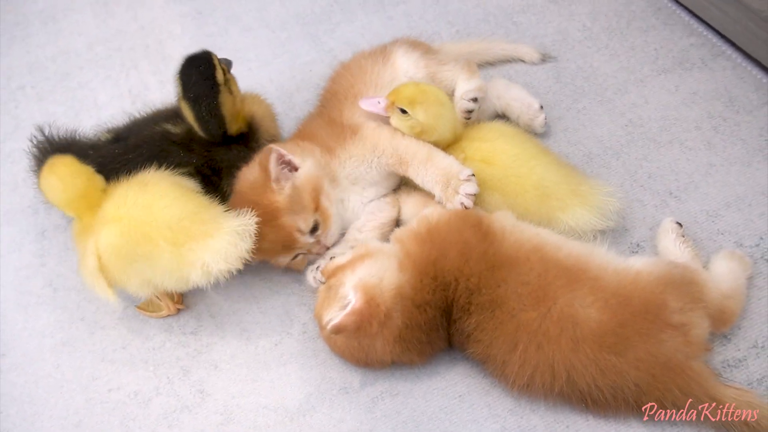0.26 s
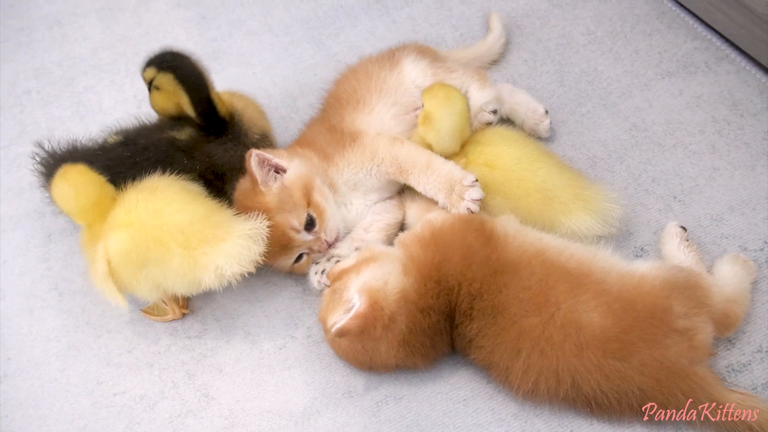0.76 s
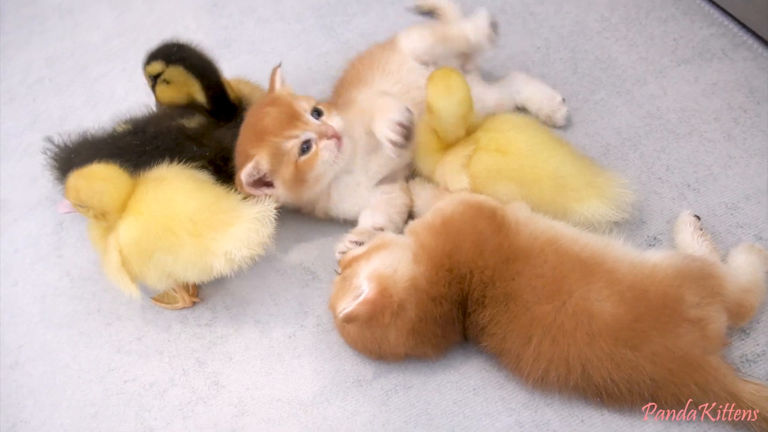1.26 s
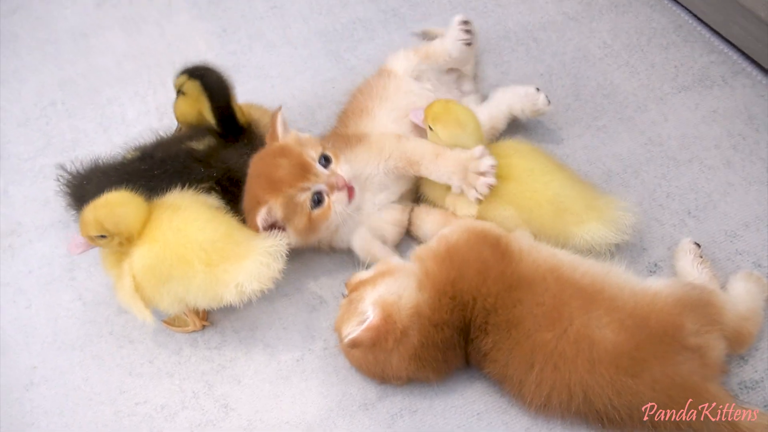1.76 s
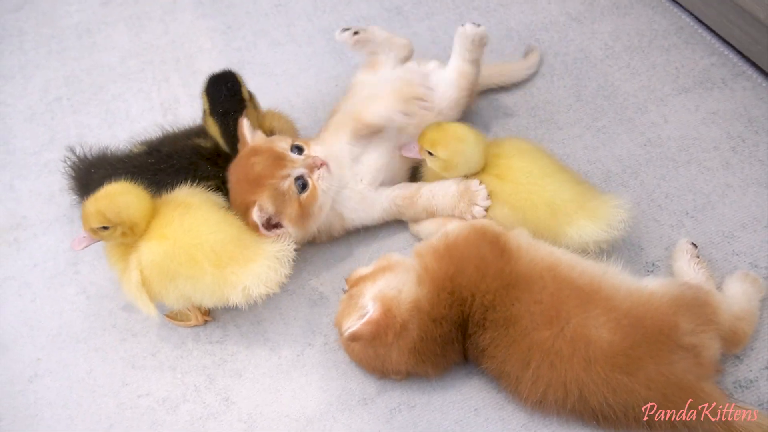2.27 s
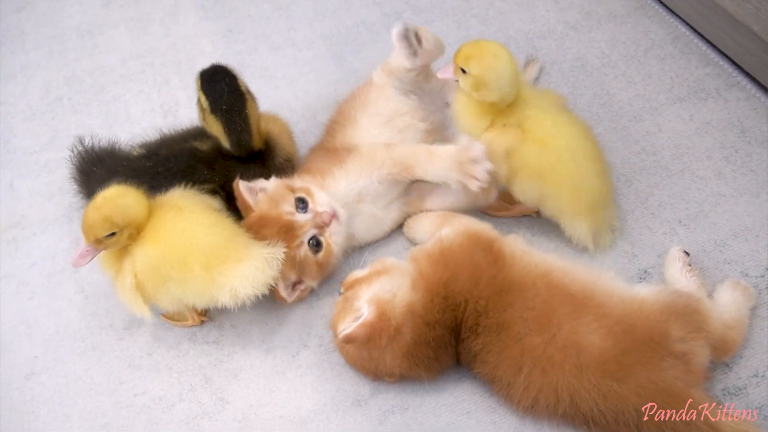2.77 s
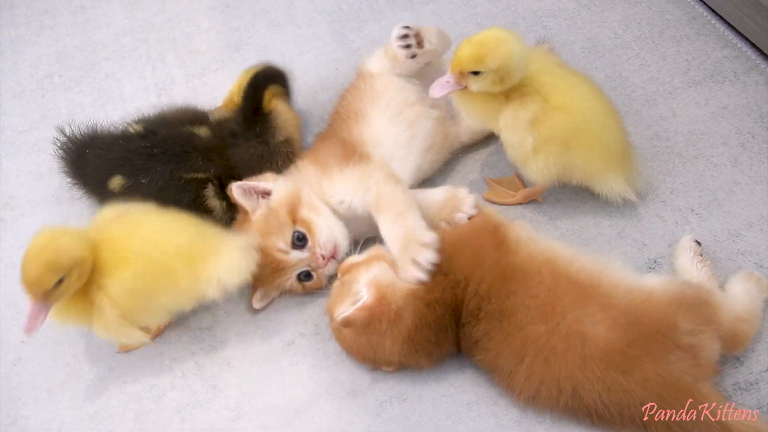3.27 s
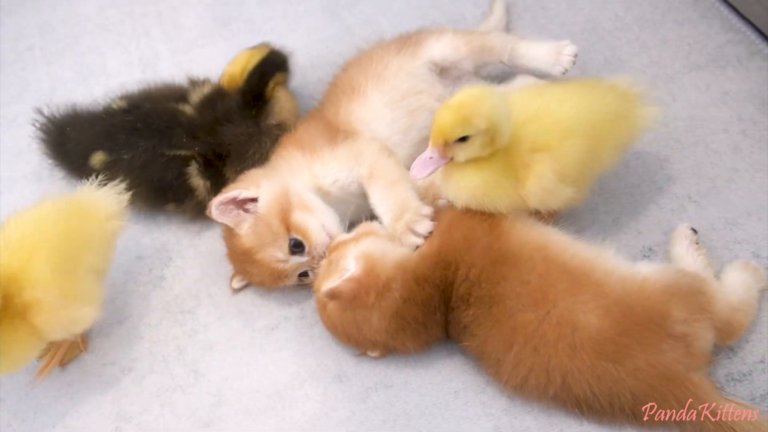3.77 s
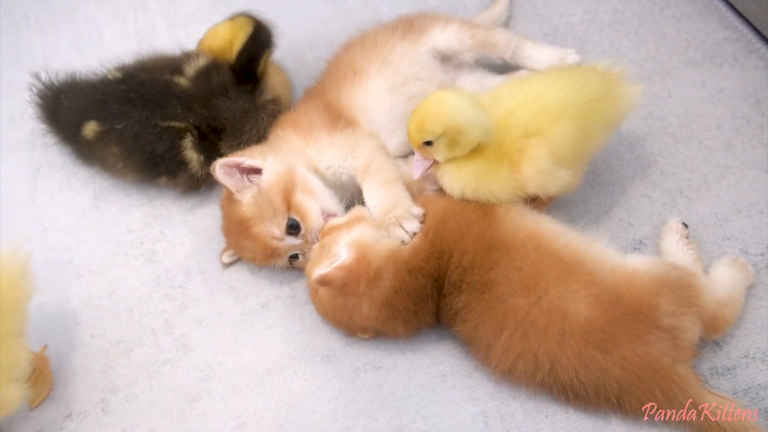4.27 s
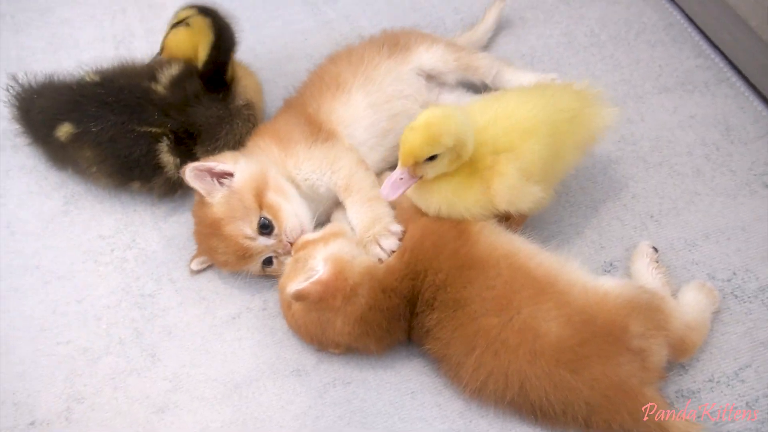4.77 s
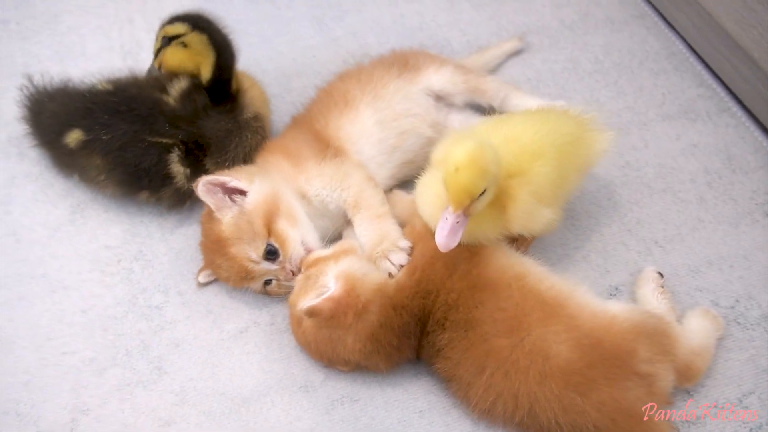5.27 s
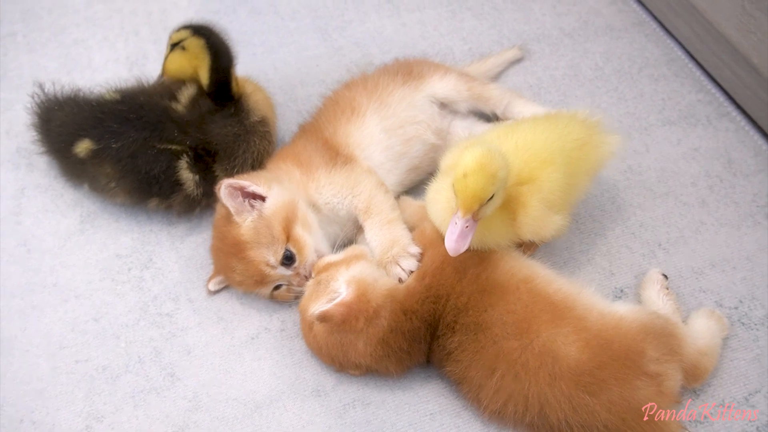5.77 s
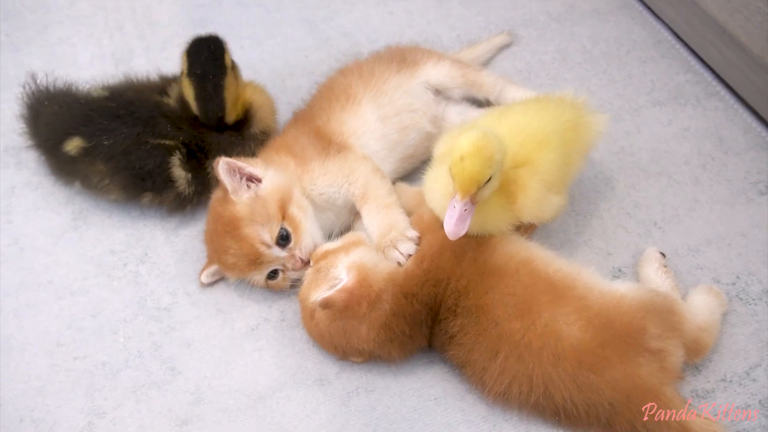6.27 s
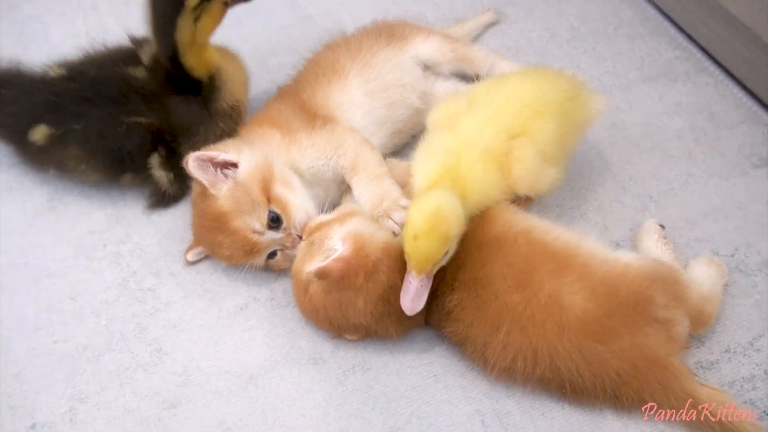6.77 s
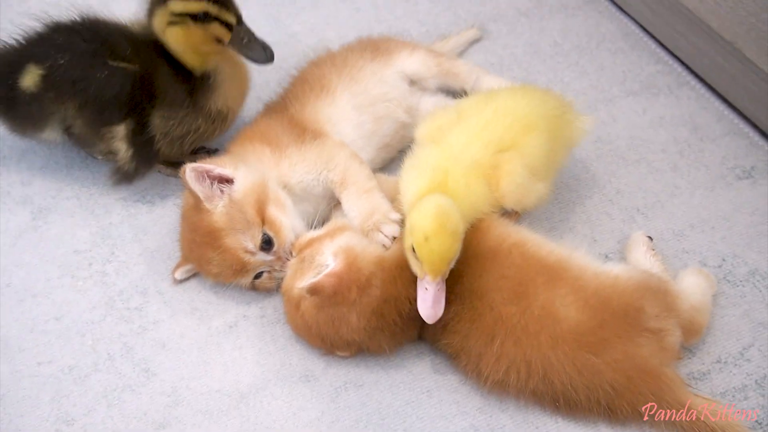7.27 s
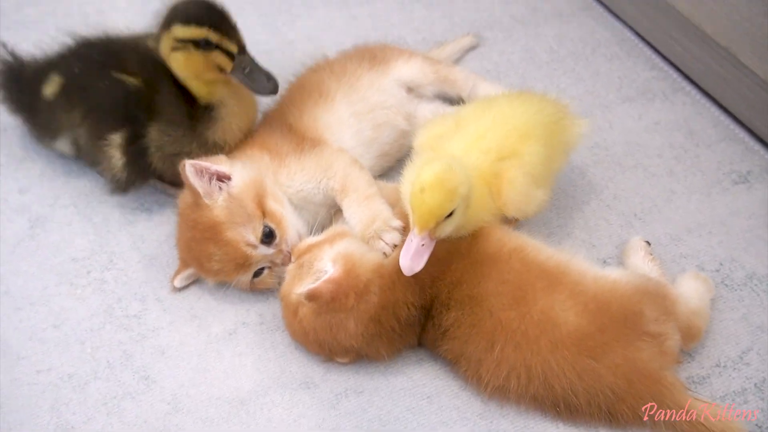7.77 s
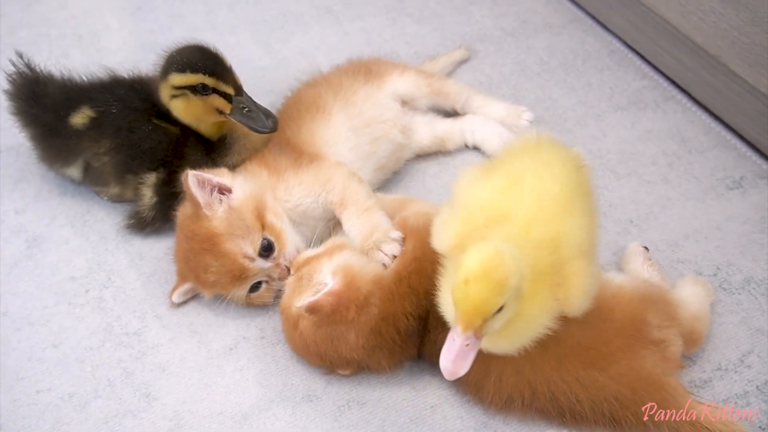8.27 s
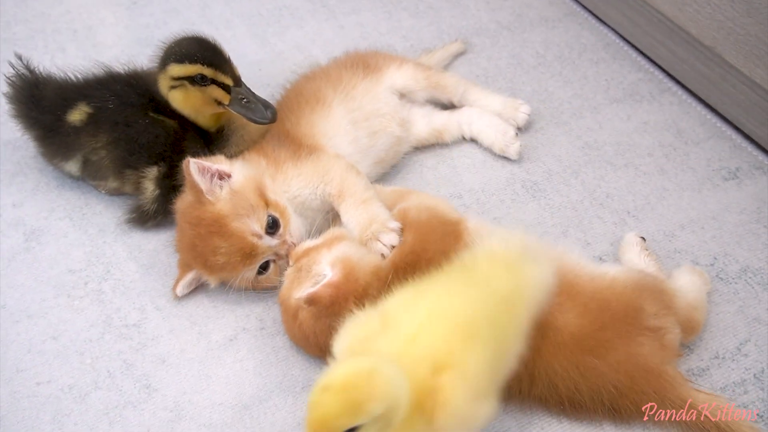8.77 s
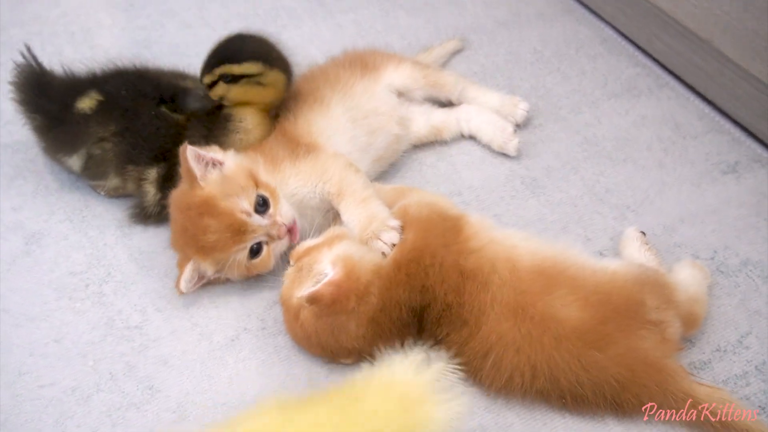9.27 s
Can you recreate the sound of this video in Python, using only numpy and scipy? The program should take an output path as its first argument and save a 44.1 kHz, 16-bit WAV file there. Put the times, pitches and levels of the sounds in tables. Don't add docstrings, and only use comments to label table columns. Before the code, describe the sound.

Close stereo sound of two ducklings in a small hard-floored room, with soft air hiss and a faint low fan hum throughout. From 0 s one gives thin, clear whistles that arch and fall, settling to about five a second after 1 s; the other adds very short, steep chirps during the first second. A faint brush of down and light claw ticks come just after 1 s. Around 2.5 to 3.5 s there are dull little taps, sharper ticks and tiny rubbery squeaks as feet drag. The steady whistles climb and swell, loudest at about 3.5 to 4.5 s, with quick peeps between. After 5 s they vary, then weaken, sounding more turned away and echoing. A soft body thump lands near 7.3 s, with fainter ones until 8 s. From 8.4 s the second duckling bursts out in rapid, higher peeps, continuing to the end at about 9.5 s.

```python
import sys
import numpy as np
from scipy import signal
from scipy.fft import rfft, irfft, next_fast_len
from scipy.io import wavfile
from scipy.ndimage import uniform_filter1d, map_coordinates

SR = 44100
rng = np.random.default_rng(int(sys.argv[2]) if len(sys.argv) > 2 else 0)


def transcribe(signal):
    frames = np.atleast_2d(signal).T
    limited = np.clip(frames, -1, 1)
    pcm = np.round(limited * 32767).astype(np.int16)
    wavfile.write(sys.argv[1], SR, pcm)


def field_ratio(decibels):
    return 10 ** (np.asarray(decibels, dtype=float) / 20)


N = 420713


def on_log(hz, points):
    points = np.array(points)
    return np.interp(np.log(hz + 1), np.log(points[:, 0]), points[:, 1])


def read_at(s, rows):
    times, *columns = np.transpose(rows)
    return [np.interp(s, times, column) for column in columns]


def unit(x):
    return x / np.sqrt(np.mean(x ** 2))


def band(x, hz, width):
    return signal.lfilter(*signal.iirpeak(hz, hz / width, SR), x)


def walk(rate):
    hold = int(SR / rate)
    held = np.repeat(rng.standard_normal(N // hold + 1), hold)
    smooth = uniform_filter1d(uniform_filter1d(held, hold), hold)
    return unit(smooth[:N])


def add(out, s, sound, pan_db=0, lag=0, wet_db=0):
    room_s, low_hz, top_hz = 0.55, 700, 11000
    early_db, early_t60_s, early_shared = -2.5, 0.07, 0.39
    late_db, late_t60_s = 0, 0.18
    t = np.arange(int(room_s * SR)) / SR
    shared, *own = rng.standard_normal((3, len(t)))
    own = np.array(own)
    shared = unit(shared * (np.abs(shared) > 2.6))
    common = np.array([np.roll(shared, lag), shared])
    early = np.sqrt(early_shared) * common + np.sqrt(1 - early_shared) * own
    early = early * field_ratio(early_db - 60 * t / early_t60_s) / np.sqrt(early_t60_s)
    late = own[:, ::-1] * field_ratio(late_db - 60 * t / late_t60_s) / np.sqrt(late_t60_s)
    absorption = signal.butter(1, [low_hz, top_hz], "band", fs=SR)
    echo = signal.lfilter(*absorption, early + late)
    onset = np.clip(t / 0.003, 0, 1)
    echo = field_ratio(wet_db) * echo * onset * np.sqrt(2 * np.log(1000) / SR)
    echo[0, max(lag, 0)] += field_ratio(pan_db / 2)
    echo[1, max(-lag, 0)] += field_ratio(-pan_db / 2)
    heard = signal.fftconvolve(sound[None], echo, axes=1)
    start = int(s * SR)
    stop = min(N, start + heard.shape[1])
    out[:, start:stop] += heard[:, :stop - start]


def room_hiss():
    # (frequency [Hz], density [dB per Hz])
    air = [(15, -57.5), (25, -19.5), (76, 1), (166, -2.5), (242, -7.5), (420, -9), (750, -9.5),
           (1150, -13.5), (2700, -20), (5000, -23), (9300, -26.5), (15000, -27.5), (16500, -49)]
    # (frequency [Hz], share [-1 to 1])
    likeness = [(60, 1), (130, 0.94), (290, 0.48), (640, 0.17), (1400, -0.26), (3100, 0.027), (15000, 0.25)]
    size = next_fast_len(N)
    hz = np.arange(size // 2 + 1) * SR / size
    like = np.clip(on_log(hz, likeness), -0.99, 0.995)
    noise = rfft(rng.standard_normal((2, size))) * field_ratio(on_log(hz, air))
    mid, side = noise * np.sqrt([1 + like, 1 - like])
    return field_ratio(-55) * unit(irfft([mid + side, mid - side], size)[:, :N])


def fan_hum():
    # (centre [Hz], width [Hz], level [dB])
    resonances = [
        (81, 32, -61.5),
        (106.7, 4.5, -67),
        (171.7, 29.3, -61),
    ]
    hum = np.zeros(N)
    for hz, width, db in resonances:
        tone = band(band(rng.standard_normal(N), hz, width), hz, width)
        hum += field_ratio(db + 0.28 * walk(1.39)) * unit(tone)
    return hum


def down_rustle():
    # (time [s], length [s], level [dB])
    brushes = [
        (1.024, 0.27, -82),
        (7.983, 0.16, -87),
    ]
    out = np.zeros((2, N))
    for s, length, db in brushes:
        t = np.arange(0, length, 1 / SR)
        fibres = rng.standard_normal(len(t)) * field_ratio(2.6 * rng.exponential(size=len(t)))
        hiss = unit(band(fibres, 3900, 6100)) + 0.65 * unit(band(fibres, 17400, 1200))
        sway_db = 4.5 * np.sin(2 * np.pi * t / 0.17)
        swell = np.hanning(len(t)) ** 0.086
        add(out, s, field_ratio(db + sway_db + 16.0) * hiss * swell, wet_db=2.5)
    return out


def body_thumps():
    # (time [s], peak level [dB], centre [Hz], 60 dB decay [s])
    thumps = [(2.555, -31.5, 700, 0.0009), (2.856, -42, 470, 0.04), (3.207, -46, 310, 0.03),
              (3.444, -46, 332, 0.045), (3.483, -44, 900, 0.0026), (6.716, -38, 312, 0.006),
              (7.132, -43.5, 1440, .003), (7.278, -28.5, 583, 0.041), (7.28, -38, 320, 0.022),
              (7.279, -37, 870, 0.011), (7.296, -36.5, 522, 0.022), (7.56, -47.5, 600, 0.043),
              (7.844, -45, 278, 0.047), (8.015, -42.5, 1110, 0.00083), (8.03, -49, 804, .005)]
    out, t = np.zeros((2, N)), np.arange(4000) / SR
    for s, db, hz, ring_s in thumps:
        push = t * hz * np.exp(-4 * t * hz)
        mode = np.sin(2 * np.pi * hz * t) * field_ratio(-60 * t / ring_s)
        knock = np.gradient(signal.fftconvolve(push, mode)[:len(t)])
        add(out, s, field_ratio(db) * knock / np.abs(knock).max(), wet_db=2.5)
    return out


def claw_ticks():
    # (time [s], peak level [dB], left minus right [dB], centre [Hz])
    ticks = [(1.135, -39, -6, 7000), (1.224, -43, -20, 8000), (1.288, -45, -6, 13100),
             (2.110, -41, -5, 11000), (2.543, -56, 9.5, 8900), (2.554, -41.5, -11, 8000),
             (2.895, -35, -10, 13000), (3.210, -27.5, -10, 9000), (3.222, -50, 2, 13000),
             (3.390, -33, 1, 12600), (3.442, -29.5, -9, 7400), (3.458, -43.5, 5, 12900),
             (4.956, -37.5, 0, 12000), (5.537, -43, 4, 5600), (5.871, -39, -8, 10000),
             (6.953, -42, -3, 5500), (7.131, -46, -2, 3500), (8.429, -66, 27, 12000),
             (8.946, -46, -22.5, 12000), (9.187, -38.5, 7, 12000)]
    out, t = np.zeros((2, N)), np.arange(4000) / SR
    for s, db, pan_db, hz in ticks:
        burst = rng.standard_normal(len(t)) * field_ratio(-60 * t / 0.006)
        crack = band(burst, hz, 0.8 * hz)
        add(out, s, field_ratio(db) * crack / np.abs(crack).max(), pan_db, wet_db=-2.5)
    return out


def sole_squeaks():
    # (time [s], start pitch [Hz], end pitch [Hz], length [s], level [dB])
    squeaks = [
        (3.044, 1134, 1570, 0.039, -44),
        (3.153, 860, 1110, 0.0365, -56),
        (3.156, 1790, 2220, 0.0256, -52.5),
        (3.142, 1540, 1280, 0.014, -52.5),
        (3.206, 1230, 1120, 0.0082, -51.5),
        (3.307, 870, 1670, 0.0183, -52.5),
        (3.336, 1420, 1160, 0.011, -56.5),
        (3.441, 1210, 1250, 0.0066, -44.5),
    ]
    out = np.zeros((2, N))
    for s, start, end, length, db in squeaks:
        u = np.linspace(0, 1, int(length * SR))
        judder = 0.03 * unit(uniform_filter1d(rng.standard_normal(4000), size=60))[:len(u)]
        hz = (start + (end - start) * u ** 0.72) * (1 + judder)
        phase = 2 * np.pi * np.cumsum(hz) / SR
        tone = np.sin(phase) + field_ratio(-9.5) * np.sin(2 * phase)
        squeak = np.sin(np.pi * u) ** 0.37 * tone
        add(out, s, field_ratio(db + 3.0) * squeak, -3, wet_db=-3)
    return out


def peep(top, low, length, bend, run_on, scoop_hz, scoop_s, rise_s, fall_db, bright_db, droop_hz):
    overtone_db = [-18, -15, -29.5]
    throat_hz, throat_width_hz = 8120, 1060
    flutter_db, flutter_s = 3, 0.005
    t = np.arange(int(length * run_on * SR)) / SR
    fallen = t / length
    hz = top - (top - low) * fallen ** bend - scoop_hz * np.exp(-t / scoop_s)
    hz = hz - droop_hz * np.exp((t - t[-1]) / 0.00752)
    phase = 2 * np.pi * np.cumsum(hz) / SR
    rise = 1 - np.exp(-t / rise_s)
    close = np.clip((t[-1] - t) / 0.008, 0, 1)

    second, third, fourth = (field_ratio(db + bright_db) * np.sin((k + 2) * phase) for k, db in enumerate(overtone_db))
    throat = 1 / (1 + ((2 * hz - throat_hz) / throat_width_hz) ** 4)
    effort = field_ratio(min(top - 4400, 0) / 65)
    upper = third * field_ratio(-22 * fallen ** 0.41) + fourth * field_ratio(-8 * fallen)
    late = 1 - np.exp(-(t / 0.0049) ** 2)
    overtones = late * (throat * second + effort * upper)

    breath = rng.standard_normal(40)
    flutter = field_ratio(flutter_db * map_coordinates(breath, [t / flutter_s], mode="mirror"))
    fundamental = field_ratio(fall_db * fallen ** 1.29) * np.sin(phase)
    return flutter * close * rise * (fundamental + overtones)


def quick_caller():
    # (time [s], top pitch [Hz], length [s], level [dB], left minus right [dB])
    outbursts = [(0.056, 4080, 0.036, -36.5, 3), (0.419, 3810, 0.034, -38, 6),
                 (0.436, 4015, 0.0176, -24.5, 4), (0.675, 4160, 0.013, -22, -6),
                 (0.751, 4750, 0.025, -26.5, -4), (0.851, 4750, 0.016, -22.5, -4.5),
                 (1.029, 3600, 0.049, -32.5, -1), (1.042, 3910, 0.018, -28, 1),
                 (2.77, 4780, 0.026, -29, -10), (2.867, 4574, 0.012, -14, -4),
                 (2.962, 4600, 0.015, -21, -9), (3.556, 4270, 0.017, -30.5, -7),
                 (3.947, 4270, 0.024, -30, -1), (4.027, 5150, 0.024, -29, -4),
                 (4.113, 4900, 0.027, -23, -1), (4.214, 5000, 0.031, -29, -5),
                 (4.784, 4300, 0.021, -30.5, 2), (4.855, 4840, 0.036, -29, -8),
                 (4.952, 5100, 0.027, -27, -6),
                 (5.664, 3990, 0.028, -35.5, -7), (5.748, 4950, 0.018, -21.5, -1),
                  (5.834, 5140, 0.03, -28, -6), (5.936, 5140, 0.031, -27.5, -6),
                  (6.116, 4680, 0.037, -33, -11), (6.601, 4350, 0.031, -29.5, -5),
                  (8.396, 4700, 0.028, -28, -6.5), (8.469, 4870, 0.035, -26.5, -7),
                  (8.552, 5090, 0.039, -28.5, -4), (8.65, 4810, 0.033, -29, -10),
                  (8.862, 4940, 0.027, -25, 0), (8.94, 5370, 0.032, -24, 3.5),
                  (9.124, 5110, 0.026, -28, -2), (9.208, 5270, 0.034, -24, 3), (9.38, 5540, 0.036, -25, 2),
                  (9.469, 5330, 0.033, -28, 4)]
    out = np.zeros((2, N))
    for s, top, length, db, pan_db in outbursts:
        low = 2886 - 0.6 * max(4200 - top, 0)
        arch = np.clip(2.2 - (top - low) / length / 26000, 0, 1)
        call = peep(top, low, length, bend=0.99 + 1.08 * arch, run_on=1.0, scoop_hz=400 + 150 * arch,
                    scoop_s=0.0012 + 0.00233 * arch, rise_s=0.0093, fall_db=-10.5, bright_db=-5.5, droop_hz=58)
        add(out, s, field_ratio(db) * call, pan_db, wet_db=-3)
    return out


def steady_caller():
    # (time [s], top pitch [Hz], level [dB], echo level [dB])
    steady_calls = [(0.144, 4170, -32.5, -4.5), (0.499, 3940, -34, -5.5), (0.738, 3740, -41, -3.5),
                    (1.112, 4036, -34, -2.5), (1.315, 3800, -41.5, -4.5), (1.524, 3830, -39, -6),
                    (1.719, 3845, -36, -6), (1.912, 3877, -36, -6), (2.103, 3960, -35, -4.5),
                    (2.289, 3977, -36.5, -3), (2.474, 4115, -36.5, 0.5), (2.657, 4018, -34.5, -2),
                    (2.838, 4060, -36, 3), (3.023, 4226, -31, -1.5), (3.205, 4275, -25, -1.5),
                    (3.385, 4370, -17, -2.5), (3.558, 4426, -13.5, -1.5), (3.741, 4340, -11.5, -4),
                    (3.916, 4383, -14.5, -1.5), (4.096, 4676, -14.5, -1), (4.284, 4438, -15.5, -5),
                    (4.458, 4423, -16, -1), (4.634, 4470, -25, 7), (4.81, 4360, -26.5, 5.5),
                    (5.001, 4440, -20, -2.5), (5.175, 4407, -28.5, 7), (5.355, 4373, -29.5, 3.5),
              (5.53, 4533, -20, 5), (5.705, 4414, -13.5, -2.5), (5.884, 4540, -20, 7),
              (6.065, 4477, -24, 10), (6.25, 4480, -14.5, 0), (6.438, 4404, -29, 14.5),
              (6.63, 4500, -23.5, 4.5), (6.804, 4400, -34, 10), (6.98, 4600, -27, 7), (7.169, 4440, -34, 6),
              (7.351, 4470, -38.5, 7), (7.531, 4410, -39, 4.5), (7.714, 4370, -39, 5.5),
              (7.891, 4410, -40.5, 11.5), (8.074, 4325, -35.5, 6), (8.25, 4415, -36.5, 8),
              (8.428, 4434, -29, 5), (8.612, 4340, -31, 7.5), (8.8, 4350, -36, 10), (8.995, 4274, -27, 3.5),
              (9.192, 4260, -29, 6.5), (9.38, 4407, -30.5, 12)]
    # (time [s], left minus right [dB], fade along the fall [dB], overtones [dB])
    balance_and_bill = [(0.14, 1, -6, -8), (0.5, 1, 3, -2), (0.9, 4, -1.5, 5.5), (1.9, 2.5, -3, 8.5),
                        (2.66, 3.5, -7, 6), (3.019, 13, -1.5, 0.5), (3.4, 10, -16.5, -11.5), (3.65, 3, -24, -15),
                        (4.1, 2.5, -21, -12), (4.3, 2.5, -20.5, -15), (4.7, 17.5, -22, -12), (5.36, 1, -12.5, -4.5),
                        (5.53, -12.5, -28.5, -14), (6.45, 6, -27.5, -15), (6.85, 3, -22, -12), (7.35, 12, -13.5, -7),
                        (7.53, 12, -9, -8.5), (9.4, 9, -22.5, -13)]
    # (time [s], time spent falling [s], bend of the fall [exponent])
    breath = [(0.1, 0.039, 1.24), (1.1, 0.044, 2.7), (1.7, 0.046, 1.65), (2.6, 0.046, 2.35),
              (3.201, 0.05, 1.19), (3.6, 0.054, 1.34), (3.9, 0.055, 1.3), (4.4, 0.046, 1.08),
              (5.6, 0.05, 2.18), (7.0, 0.051, 1.16), (8.1, 0.058, 1.85), (8.7, 0.05, 1.6),
              (9.3, 0.046, 1.6)]
    # (time [s], lag of the left port [samples])
    port_lag = [(0, -14), (5.8, -14), (6.5, -10)]
    out = np.zeros((2, N))
    for s, top, db, wet_db in steady_calls:
        pan_db, fall_db, bright_db = read_at(s, balance_and_bill)
        length, bend = read_at(s, breath)
        lag = int(read_at(s, port_lag)[0])
        rise_s = np.clip(0.0034 + 0.00904 * (top - 3900) / 450, 0.003, 0.011)
        low = 3589 + 0.33 * (top - 4300)
        scoop_hz = 350 + 1.24 * max(4500 - top, 0)
        call = peep(top, low, length, bend, run_on=1.099, scoop_hz=scoop_hz, scoop_s=0.00263, rise_s=rise_s,
                    fall_db=fall_db, bright_db=bright_db, droop_hz=454)
        add(out, s, field_ratio(db) * call, pan_db, lag, wet_db)
    return out


def scene():
    room_tone = room_hiss() + fan_hum()
    shuffling = down_rustle() + body_thumps() + claw_ticks() + sole_squeaks()
    return room_tone + shuffling + quick_caller() + steady_caller()


def roll_off(x):
    return signal.sosfilt(signal.butter(12, 16610, fs=SR, output="sos"), x)


def record(dry):
    thinning_db = -36
    call_band = signal.butter(4, [3300, 4600], "band", fs=SR, output="sos")
    above_band = signal.butter(4, [4800, 6500], "band", fs=SR, output="sos")
    calls = signal.sosfiltfilt(call_band, dry)
    above = signal.sosfiltfilt(above_band, dry)
    loud = uniform_filter1d(calls ** 2, size=1500, origin=600)
    faint = uniform_filter1d(above ** 2, size=1500, origin=600)
    thinning = loud * field_ratio(2 * thinning_db)
    thinned = dry - above * thinning ** 2 / (thinning ** 2 + faint ** 2 + 1e-30)
    low_pass = signal.ellip(10, 0.2, 80, 15750, fs=SR, output="sos")
    mix = signal.sosfilt(low_pass, thinned)
    return roll_off(mix)


dry = scene()
out = record(dry)
transcribe(out)
```